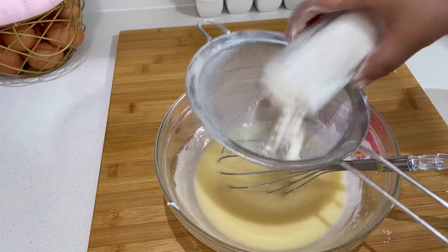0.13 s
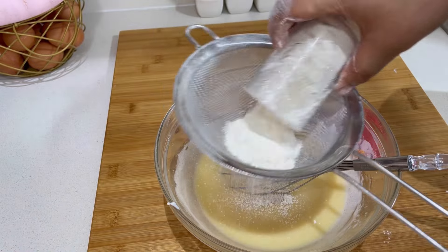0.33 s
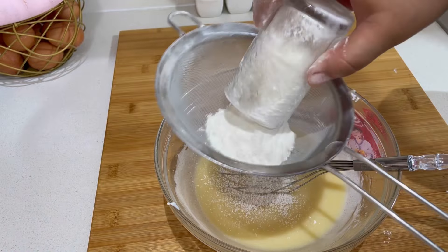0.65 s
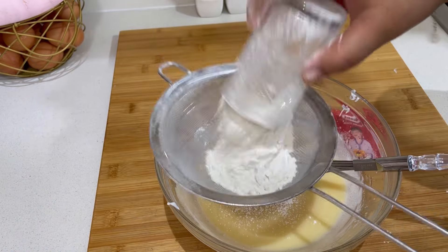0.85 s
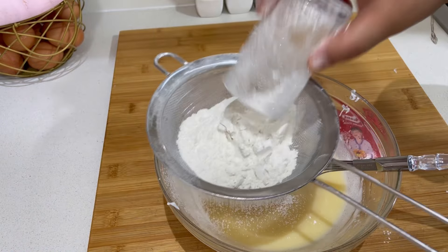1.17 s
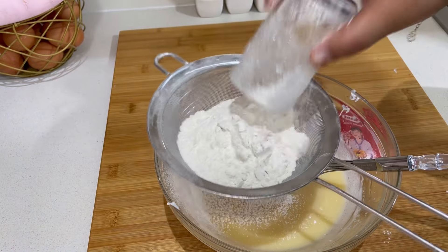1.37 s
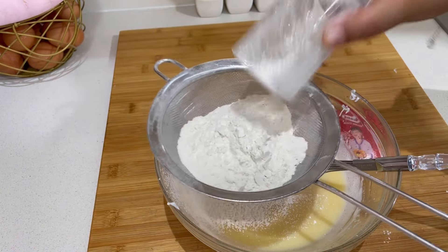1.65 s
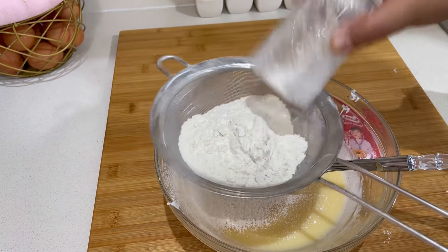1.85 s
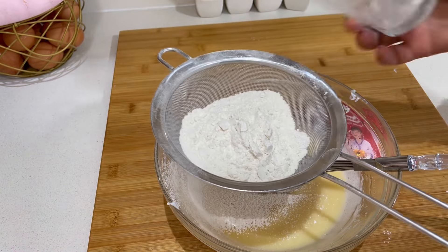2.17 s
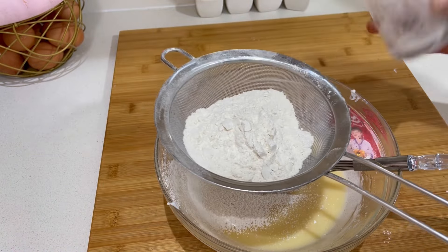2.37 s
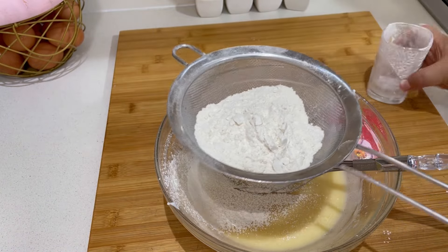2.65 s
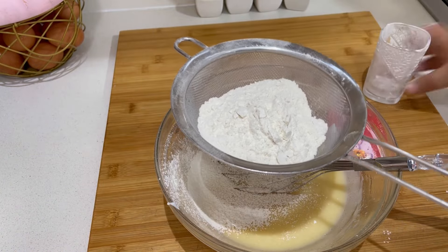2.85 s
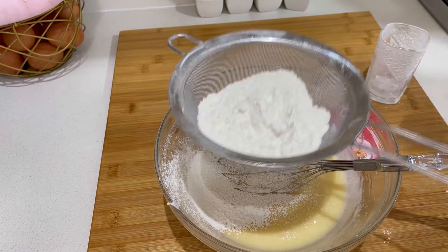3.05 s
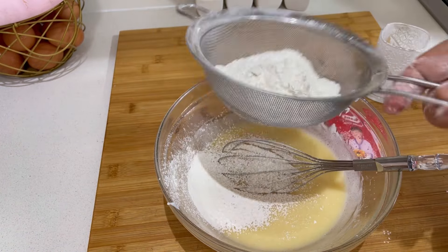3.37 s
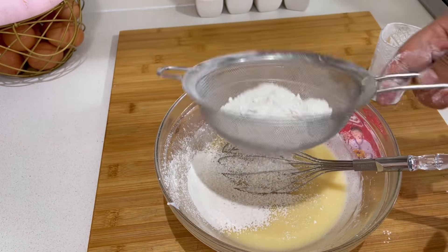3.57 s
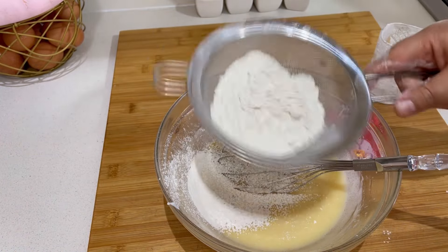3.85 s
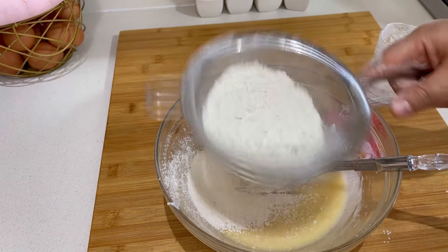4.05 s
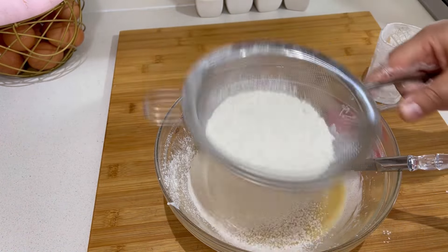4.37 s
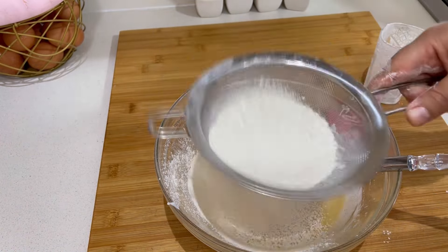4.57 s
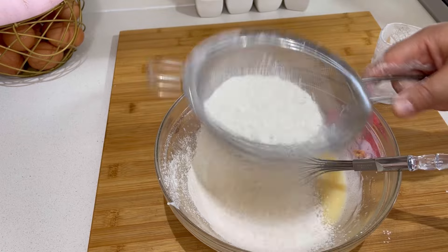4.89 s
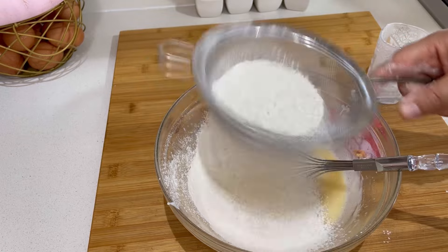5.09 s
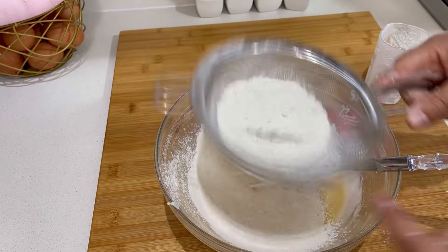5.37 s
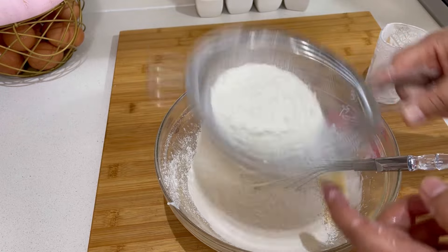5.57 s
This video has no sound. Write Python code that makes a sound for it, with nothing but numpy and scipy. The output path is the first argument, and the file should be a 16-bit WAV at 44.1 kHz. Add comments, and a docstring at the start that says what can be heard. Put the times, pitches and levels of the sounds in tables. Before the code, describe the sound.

A glass tumbler raps six times on a steel sieve rim, thuds onto a wooden board, then flour is shaken in quick rhythmic swishes.

```python
"""A steady rush and a deep rumble fill a small kitchen; a wire ticks, and flour is tipped into a steel sieve. A
glass tumbler raps six times on the sieve's rim, exciting damped modes of glass and rim, coloured alike each
time by fixed resonances. It is set down on a wooden board, which rings through its own modes under a dying thud
of noise. Then the sieve is lifted and shaken: grainy noise swishes at every turn, and noise snaps make the wire
tick. The short sounds get a diffuse decaying room tail, and phase differences between the channels add width."""
import sys
import numpy as np
from scipy import signal
from scipy.fft import rfft, irfft, next_fast_len
from scipy.io import wavfile
from scipy.ndimage import uniform_filter1d, map_coordinates

SR = 44100
rng = np.random.default_rng(int(sys.argv[2]) if len(sys.argv) > 2 else 0)


def master_out(mix):
    """Clip the mix to full scale and print it as 16-bit PCM to the path in sys.argv[1]."""
    frames = np.transpose(np.atleast_2d(mix))
    ceiling = np.clip(frames, -1, 1)
    pcm = np.round(ceiling * 32767).astype(np.int16)
    wavfile.write(sys.argv[1], SR, pcm)


N = 252693  # length [samples]
TIME = np.arange(N) / SR  # time in the scene [s]
AGE = TIME[:SR // 2]  # time since a contact [s]


def amp(db):
    """Logarithmic level: decibels become an amplitude gain."""
    return 10 ** (np.asarray(db) / 20)


def unit(x):
    """Normalisation by effective value: x is scaled to rms 1."""
    return x / np.sqrt(np.mean(x ** 2) + 1e-20)


def along(points, hz):
    """Logarithmic frequency scale: (frequency [Hz], value) points are interpolated on it."""
    f, v = np.transpose(points)
    return np.interp(np.log(hz + 1), np.log(f + 1), v)


def filtered(x, response):
    """Linear filtering: the spectrum of x is multiplied by a response of frequency."""
    length = x.shape[-1]
    padded = next_fast_len(length + SR // 4)
    spectrum = rfft(x, padded) * response(np.fft.rfftfreq(padded, 1 / SR))
    return irfft(spectrum, padded)[..., :length]


def noise(spectrum, shape):
    """Random excitation: white noise is coloured by a spectrum and scaled to rms 1."""
    white = rng.standard_normal(shape)
    return unit(filtered(white, lambda hz: amp(along(spectrum, hz))))


def fade(t, t60):
    """Exponential damping: the gain falls by 60 dB in t60 seconds."""
    return np.exp(-np.log(1000) * t / t60)


def onset(t, rise):
    """Exponential build-up: the gain approaches 1 with the time constant rise, in seconds."""
    return 1 - np.exp(-t / rise)


def dying(x, t60s, size):
    """Frequency-dependent damping: each band of x decays at its own rate."""
    hz, t, bands = signal.stft(x, SR, nperseg=size)
    damped = bands * fade(t, along(t60s, hz)[:, None])
    return signal.istft(damped, SR, nperseg=size)[1][..., :x.shape[-1]]


def ring(modes, gains_db):
    """Modal superposition: damped sines of random starting phase build up briefly, then decay."""
    total = 0
    for (hz, db, t60, rise), extra_db in zip(modes, gains_db):
        sine = np.sin(2 * np.pi * (hz * AGE + rng.random()))
        total = total + amp(db + extra_db) * fade(AGE, t60) * onset(AGE, rise) * sine
    return total


def burst(spectrum, t60):
    """Blunt contact: coloured noise starts softly and decays exponentially."""
    return noise(spectrum, len(AGE)) * fade(AGE, t60) * onset(AGE, rise=0.00022)


def brighten(x, slope_db, corner_hz):
    """Contact hardness: a slope in dB per octave tilts the spectrum above the corner, up if positive."""
    return filtered(x, lambda hz: amp(slope_db * np.log2(np.maximum(hz / corner_hz, 1))))


def swell(s, width_s, db):
    """Gaussian envelope: the gain peaks at time s; width_s is the standard deviation of its square."""
    return amp(db) * np.exp(-.25 * ((TIME - s) / width_s) ** 2)


def wobble(rate):
    """Random modulation: a smooth curve runs through normal random knots, rate of them a second."""
    knots = rng.standard_normal(int(N * rate / SR) + 4)
    return map_coordinates(knots, [TIME * rate])


# Width of the diffuse sound field: (frequency [Hz], side relative to mid [dB])
SIDE_LEVEL = [(60, -39.5), (200, -14.5), (450, -6), (800, -1), (1400, -5), (2200, -17), (4000, -16),
              (4800, -5.5), (5500, -19), (7300, -11.5), (10000, -33), (12800, -10), (15000, -18.5)]


def diffuse(pair):
    """Diffuse field: two independent signals serve as mid and side, sharing the power by frequency."""
    def mid_side_gains(hz):
        side_gain = amp(along(SIDE_LEVEL, hz))
        return np.array([np.ones_like(hz), side_gain]) / np.hypot(1, side_gain)

    mid, side = filtered(pair, mid_side_gains)
    return np.array([mid + side, mid - side])


# Reverberation time of the kitchen: (frequency [Hz], t60 [s])
ROOM_T60 = [(100, 0.43), (500, 0.57), (3000, .55), (7000, .52), (14000, 0.3)]


def in_kitchen(x, wet_db):
    """Reverberation: x is convolved with diffuse decaying noise that builds up as the walls reply."""
    tail = dying(rng.standard_normal((2, SR)), ROOM_T60, size=256) * onset(TIME[:SR], rise=.008)
    room_answer = diffuse(tail / np.linalg.norm(tail[0]))
    wet = signal.fftconvolve(x[None], room_answer, axes=1)
    return np.pad(x, (0, SR - 1)) + amp(wet_db) * wet


def add(track, s, x):
    """Superposition: x is summed into the track from time s, in seconds."""
    part = track[:, max(round(s * SR), 0):][:, :x.shape[-1]]
    part += x[..., :part.shape[-1]]


# Spectrum of the kitchen's steady rush: (frequency [Hz], relative density [dB per Hz])
RUSH_SPECTRUM = [(40, -26), (100, 3), (160, -9), (205, 1), (245, -7.5), (430, -7.5), (620, -14.5),
                 (820, -13.5), (1300, -21.5), (1930, -24.5), (2200, -34.5), (3200, -37.5), (4050, -34),
                 (5000, -42.5), (9000, -41), (15000, -48)]
# Course of the rush: (time [s], level [dB])
RUSH_LEVEL = [(0, -61.5), (.35, -63), (3.4, -64), (5.73, -61)]
# Spectrum of deep rumble, shared by the flour's landing: (frequency [Hz], relative density [dB per Hz])
RUMBLE_SPECTRUM = [(20, -41.5), (32, -22), (43, -3.5), (55, 1), (70, -6), (100, -10), (150, -23),
                   (400, -60.5)]


def background():
    """Stationary noise: a diffuse rush lies over a central deep rumble that wavers and slowly ebbs."""
    rush_gain = amp(np.interp(TIME, *np.transpose(RUSH_LEVEL)))
    rush = rush_gain * diffuse(noise(RUSH_SPECTRUM, (2, N)))
    rumble = noise(RUMBLE_SPECTRUM, N)
    start_db, ebb_db_per_s = -60, 0.5
    waver_db, wavers_per_s = 0.94, 6
    rumble_db = start_db - ebb_db_per_s * TIME + waver_db * wobble(wavers_per_s)
    return rush + rumble * amp(rumble_db)


# The bulk of the flour landing in the sieve: (middle [s], envelope width [s], level [dB])
FLOUR_LANDING = (0.4, 0.067, -55.5)


def landing():
    """Soft impact: the heap of flour lands with a slow swell of low-frequency noise, a deep bump."""
    return swell(*FLOUR_LANDING) * noise(RUMBLE_SPECTRUM, N)


# Lumps of flour dropping into the mesh: (time [s], level [dB])
LUMP_DROPS = [(0.7640, -51), (0.7783, -45.5)]
# Modes of the plop: (frequency [Hz], relative level [dB], t60 [s], rise time constant [s])
LUMP_MODES = [(400, 6, 0.058, .003), (481.6, 3.5, 0.036, .003)]


def lumps():
    """Low damped resonance: packed flour slips out of the tumbler with a soft plop of two modes."""
    out = np.zeros((2, N))
    for s, db in LUMP_DROPS:
        plop = amp(db) * ring(LUMP_MODES, rng.normal(0, 1, len(LUMP_MODES)))
        add(out, s, in_kitchen(plop, wet_db=-9))
    return out


# Ticks of the wire: (time [s], snap level [dB], tilt [dB per octave], frame tap level [dB])
WIRE_TICKS = [(0.0905, -15, -4.5, -36), (1.0700, -62, 1, -88), (2.941, -46, -20, -56),
              (3.3786, -44.5, -7, -69), (3.503, -60.5, -9, -78), (3.5591, -67, -5, -49),
              (3.6840, -47, -3, -75), (4.935, -51, -14, -60), (5.3000, -63, -5, -82),
              (5.6130, -35, -7.5, -49)]
# Spectrum of the snapping wire: (frequency [Hz], relative density [dB per Hz])
SNAP_SPECTRUM = [(100, -15), (1000, -16.5), (1750, -7.5), (2250, -15.5), (2700, -7), (3900, -27),
                 (4900, -11.5), (6400, -6), (10800, 5), (12500, -1.5), (15500, -9.5)]
# Spectrum of the frame's dull tap: (frequency [Hz], relative density [dB per Hz])
TAP_SPECTRUM = [(100, -3), (600, 15), (1100, 5.5), (1700, -4), (2700, -6), (3800, -2), (4600, -4.5),
                (9000, -21.5)]


def ticks():
    """Two-stage decay: wire snaps on its frame with a sharp crack, a brief mesh shiver and a dull tap."""
    out = np.zeros((2, N))
    for s, snap_db, tilt_db, tap_db in WIRE_TICKS:
        crack_then_shiver = fade(AGE, 0.0038) + amp(-8.5) * fade(AGE, 0.058)
        snap = noise(SNAP_SPECTRUM, len(AGE)) * crack_then_shiver
        bright_snap = amp(snap_db) * brighten(snap, tilt_db, corner_hz=3470)
        tap = amp(tap_db) * burst(TAP_SPECTRUM, t60=0.015)
        add(out, s, in_kitchen(bright_snap + tap, wet_db=-12.5))
    return out


# The tumbler's base meeting the board: (time [s], level [dB])
BASE_CONTACTS = [(2.6591, -27.5), (2.686, -33.5)]
# Modes of the board on the counter: (frequency [Hz], relative level [dB], t60 [s], rise time constant [s])
BOARD_MODES = [(115.46, -8.5, 0.43, 0.0059), (145.5, 2, 0.23, 0.0045), (221.5, -12, 0.33, 0.0046),
               (298, -14.5, 0.5, .002), (420.5, -13, 0.74, 0.018), (607, -5.5, 0.091, 0.00071),
               (655, -10.5, .12, 0.0017), (684, 0, 0.032, 0.00079), (899.6, -13, 0.35, 0.0012),
               (1126, -10, 0.033, 0.00035), (1417, -18, 0.075, 0.00041)]
# Spectrum of the thud: (frequency [Hz], relative density [dB per Hz])
THUD_SPECTRUM = [(50, -18), (150, 10.5), (400, -2.5), (750, 3), (1200, -2.5), (1700, -17), (3000, -32.5),
                 (7000, -44), (10000, -48)]


def set_down():
    """Impact on a plate: the empty tumbler lands and rocks flat; the wood takes the top off the sound."""
    out = np.zeros((2, N))
    for s, db in BASE_CONTACTS:
        thud = amp(2.5) * burst(THUD_SPECTRUM, t60=0.078)
        board = ring(BOARD_MODES, rng.normal(0, 1, len(BOARD_MODES)))
        add(out, s, amp(db) * in_kitchen(board + thud, wet_db=-7.0))
    return filtered(out, lambda hz: 1 / (1 + (hz / 7500) ** 4))


# Spectrum of flour rubbing on wire, before tilting: (frequency [Hz], relative density [dB per Hz])
FLOUR_SPECTRUM = [(500, -11), (2500, -5), (5000, -7), (7000, -5), (10000, 0.5), (13000, -1.5), (15500, 1)]


def hiss(tilt_db):
    """Granular friction: diffuse noise with fast random amplitude, like fine grains on wire, at rms 1."""
    grain = amp(1.5 * unit(uniform_filter1d(rng.standard_normal(N), size=40)))
    rubbing = brighten(noise(FLOUR_SPECTRUM, (2, N)), tilt_db, corner_hz=3000)
    return unit(grain * diffuse(rubbing))


# How hard the sieve is shaken: (time [s], swish level [dB])
SHAKE_EFFORT = [(3.96, -71), (4.16, -73), (4.48, -67), (4.92, -69), (5.03, -73.5), (5.23, -62.5),
                (5.45, -72), (5.62, -66.5)]
# Flour sliding as tumbler or sieve is tilted: (middle [s], envelope width [s], hiss level [dB])
FLOUR_SLIDES = [(.33, 0.049, -87), (.635, 0.013, -77), (2.18, .04, -66), (2.48, .035, -77),
                (2.84, 0.037, -75), (3.33, 0.15, -71.5), (3.61, 0.014, -67), (3.72, 0.041, -77)]


def sifting():
    """Power addition of envelopes: flour slides and trickles softly, and swishes at each turn of the sieve."""
    first_turn_s, stroke_s, swish_width_s = 3.961, .1072, .018
    swish_power = 0
    for s in np.arange(first_turn_s, N / SR, stroke_s):
        swish_db = np.interp(s, *np.transpose(SHAKE_EFFORT))
        swish_power = swish_power + swell(s, swish_width_s, swish_db) ** 2
    trickle_db = -88  # flour that keeps falling through the mesh
    slide_power = amp(trickle_db) ** 2 + sum(swell(*slide) ** 2 for slide in FLOUR_SLIDES)
    # the swishes sound brighter than the sliding
    return np.sqrt(swish_power) * hiss(tilt_db=-0.4) + np.sqrt(slide_power) * hiss(tilt_db=-3.5)


# Tumbler on the rim: (time [s], blow level [dB], tilt [dB per octave],
# first glass mode gain [dB], second glass mode gain [dB], rim gain [dB])
RIM_KNOCKS = [(0.942, -24.5, -6, 2, 4, -16.5), (1.1417, -16, -0.5, 6, 10, -6.5),
              (1.3394, -15.5, -7, 8, 3, -3.5), (1.514, -13, 3, 5, 4, 5.5),
              (1.702, -12.5, 2.5, 0.5, -7.5, 4.5), (1.8822, -13.5, 3, -21.5, 0.5, 3.5)]
# Modes of the ringing glass: (frequency [Hz], relative level [dB], t60 [s], rise time constant [s])
GLASS_MODES = [(2623, -11, .18, .0004), (2973, -12, .21, .0004), (6817, -4, .095, .003),
               (6880, -9, .04, .003), (7025, -17, .07, .003), (7510, -17, .06, .003),
               (7680, -9, .035, .003), (7756, -4, .065, .003), (10650, -17, .05, .002),
               (10950, -9, .045, .002), (11165, -20, .18, .002), (12475, -15, .05, .001)]
# Modes of the steel rim, damped by mesh and flour: columns as for the glass
RIM_MODES = [(2660, -9, 0.038, 0.0011), (2913, -2, .03, 0.00027), (2890, -7.5, 0.011, 0.00022),
             (3030, -13.5, 0.069, 0.00074), (3140, -13, 0.084, .001), (3256, -11.5, .035, .001)]
# Fixed resonances that colour every blow alike: columns as for the glass
SHARED_RESONANCES = [(284, -21.5, 0.11, 0.00089), (622, -20.5, .08, 0.00059), (806, -18.5, 0.089, 0.00024),
                     (905, -15.5, 0.04, 0.00033), (1250, -23.5, 0.088, 0.00097), (1495, -15, .05, 0.00019),
                     (1957, -16.5, .04, .0003), (2167, -20.5, 0.042, 0.00026), (2230, -19, .05, 0.00026),
                     (5300, -21, 0.079, 0.00035), (5450, -21, 0.05, .0003), (5930, -22, 0.055, 0.0005)]
# Spectrum of the instant of hard contact: (frequency [Hz], relative density [dB per Hz])
CRACK_SPECTRUM = [(500, -11.5), (2000, -3), (5000, -0.5), (8000, 4), (13000, -4.5), (15500, -7)]
# Spectrum of the mesh clattering in its frame: (frequency [Hz], relative density [dB per Hz])
CLATTER_SPECTRUM = [(50, -5.5), (150, 3), (300, 3.5), (800, 4), (1400, -1), (2000, -1.5), (2400, -9),
                    (3100, 4), (3800, 3.5), (4500, -5), (6200, -6), (7400, 0), (9200, -5.5), (11000, -1),
                    (13500, -20.5), (15500, -15)]
# Decay of the clatter: (frequency [Hz], t60 [s])
CLATTER_DECAY = [(150, 0.032), (1000, 0.062), (3000, 0.028), (5000, .04), (14000, 0.039)]


def knocks():
    """Impact excitation: each blow cracks, rings glass and rim, sounds the fixed resonances, and makes the
    sieve clatter."""
    out = np.zeros((2, N))
    for s, db, tilt_db, first_db, second_db, rim_db in RIM_KNOCKS:
        # where the tumbler is struck decides how its two lowest modes share the blow
        glass_db = np.r_[first_db, second_db, rng.normal(0, 1, len(GLASS_MODES) - 2)]
        glass = ring(GLASS_MODES, glass_db)
        rim = ring(RIM_MODES, rim_db + rng.normal(0, 1, len(RIM_MODES)))
        shared = ring(SHARED_RESONANCES, rng.normal(0, 1.3, len(SHARED_RESONANCES)))
        crack = amp(-2.5) * noise(CRACK_SPECTRUM, len(AGE)) * fade(AGE, 0.01)
        rattle = dying(noise(CLATTER_SPECTRUM, len(AGE)), CLATTER_DECAY, size=128)
        clatter = amp(-3.5) * rattle * onset(AGE, rise=0.00034)
        blow = brighten(crack + glass + rim + shared + clatter, tilt_db, corner_hz=2550)
        add(out, s, amp(db) * in_kitchen(blow, wet_db=-14.5))
    # such small bodies radiate almost no bass
    return filtered(out, lambda hz: (1j * hz / (60 + 1j * hz)) ** 2)


def scene():
    """Superposition of sources: everything on the counter, heard from just above the bowl."""
    return knocks() + set_down() + ticks() + lumps() + sifting() + landing() + background()


# Phase between the channels: (frequency [Hz], lead of left over right [rad])
LEFT_LEAD = [(1500, 0), (2700, .4), (3900, .2), (4800, 1.2), (5050, -.1), (6000, .2), (7000, 1.3),
             (9000, 2.9), (11500, 3.6), (14500, 6.1), (16000, 6.3)]


def record(dry):
    """Phase shift, saturation, band limit: channels part in treble phase, peaks are rounded, the top is cut."""
    share = np.array([[.5], [-.5]])  # half the lead to each channel
    pair = filtered(dry, lambda hz: np.exp(1j * share * along(LEFT_LEAD, hz)))
    ceiling, top_hz = .85, 15850  # ceiling as a fraction of full scale
    rounded = pair / (1 + np.abs(pair / ceiling) ** 10) ** (1 / 10)
    return filtered(rounded, lambda hz: 1 / np.sqrt(1 + (hz / top_hz) ** 150))


dry = scene()
out = record(dry)
master_out(out)
```